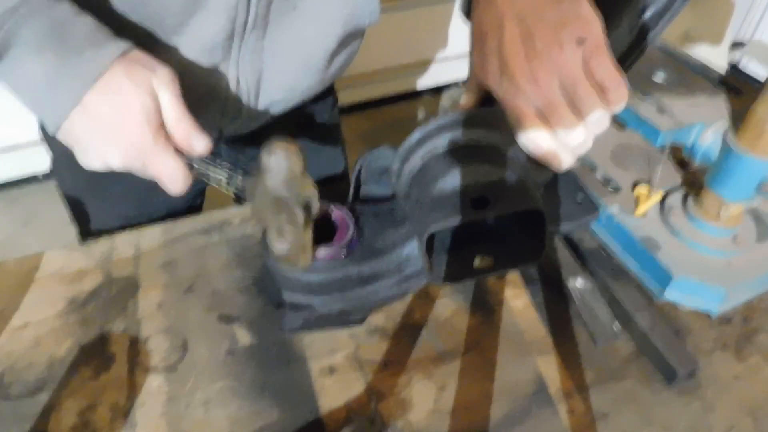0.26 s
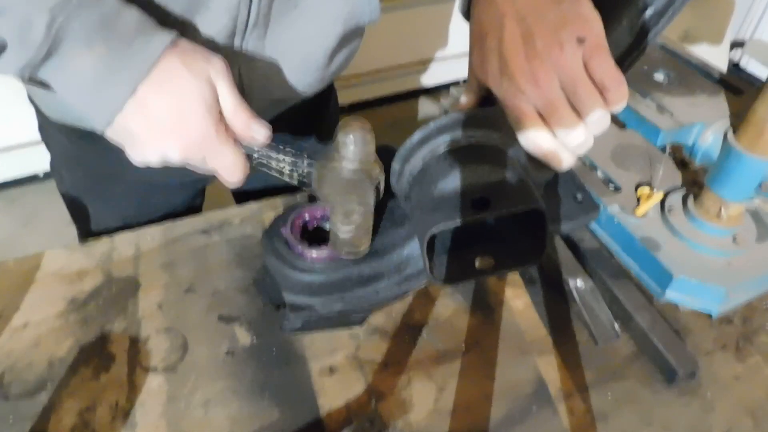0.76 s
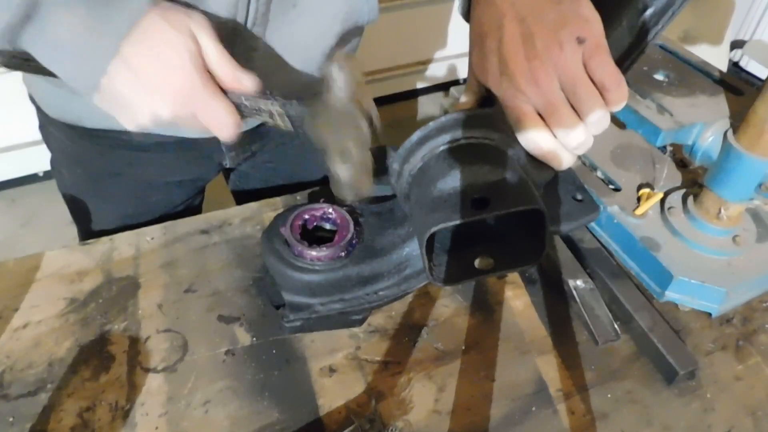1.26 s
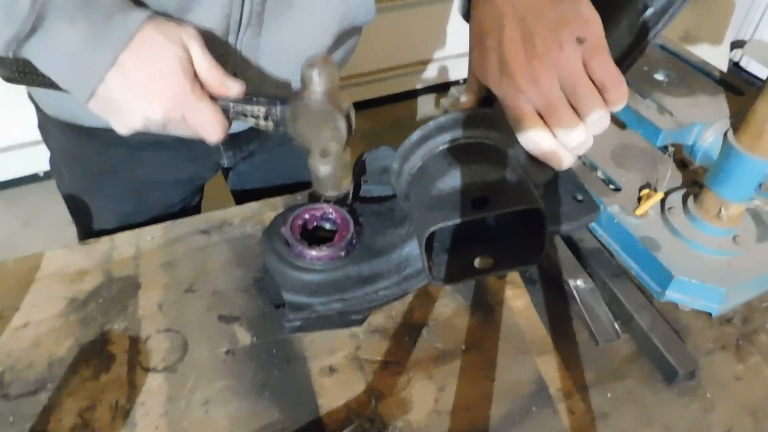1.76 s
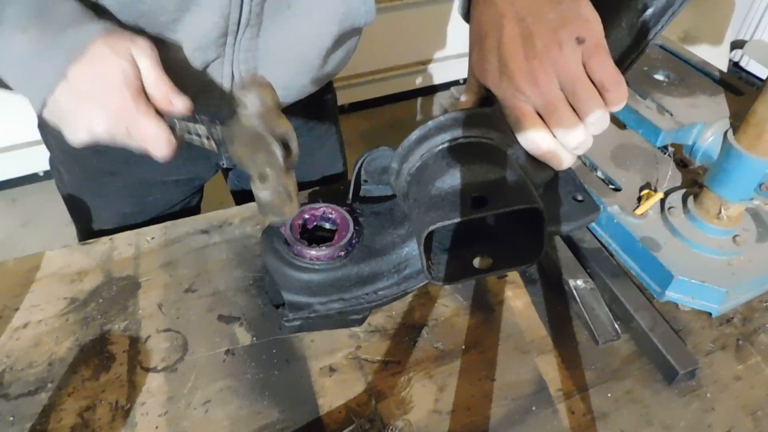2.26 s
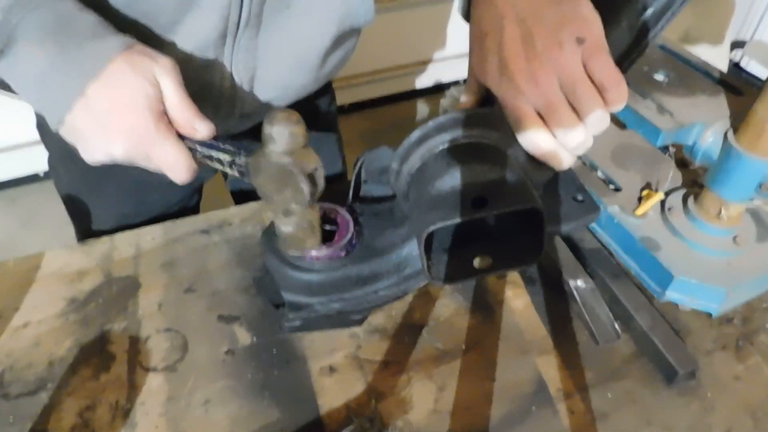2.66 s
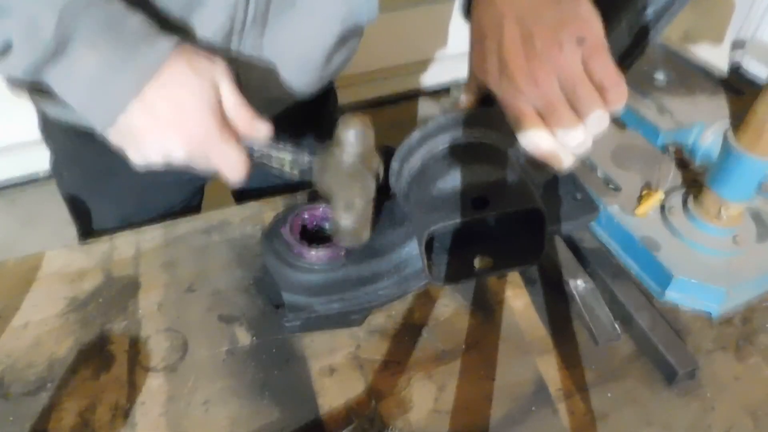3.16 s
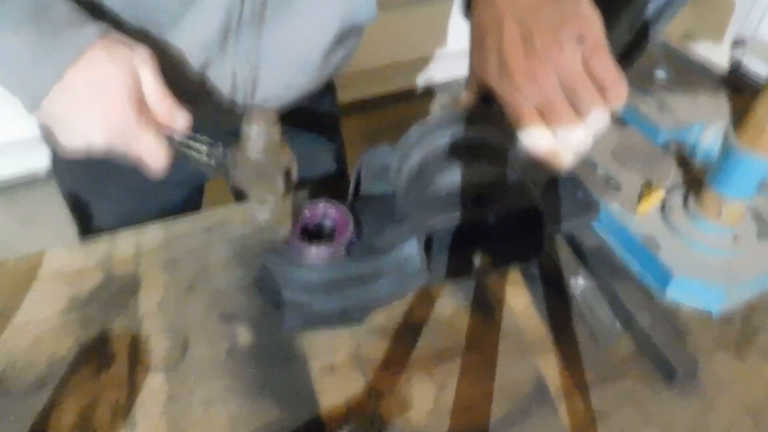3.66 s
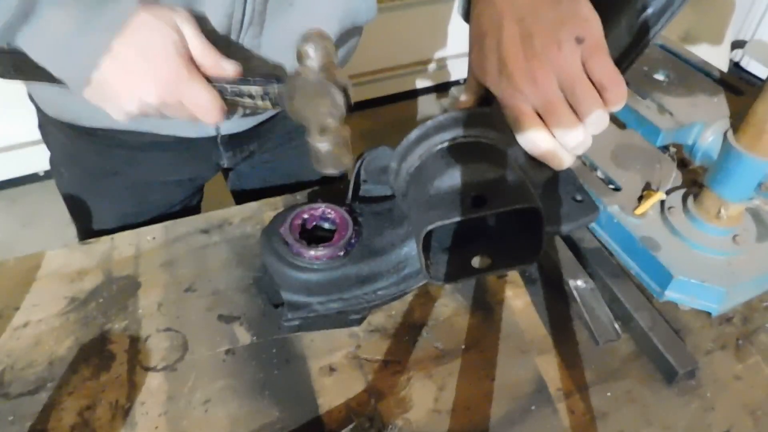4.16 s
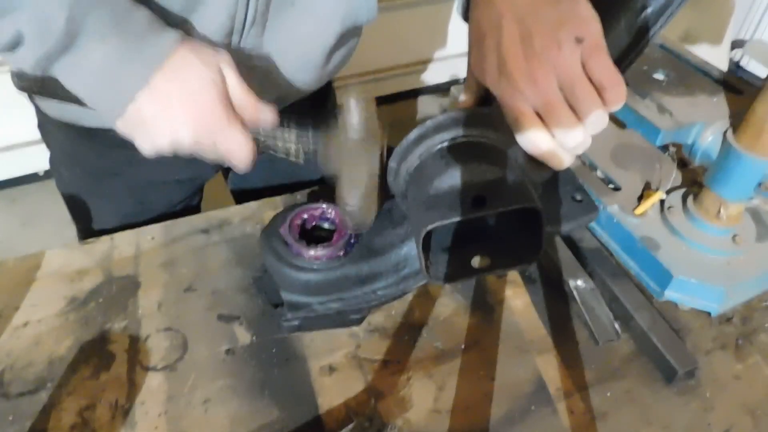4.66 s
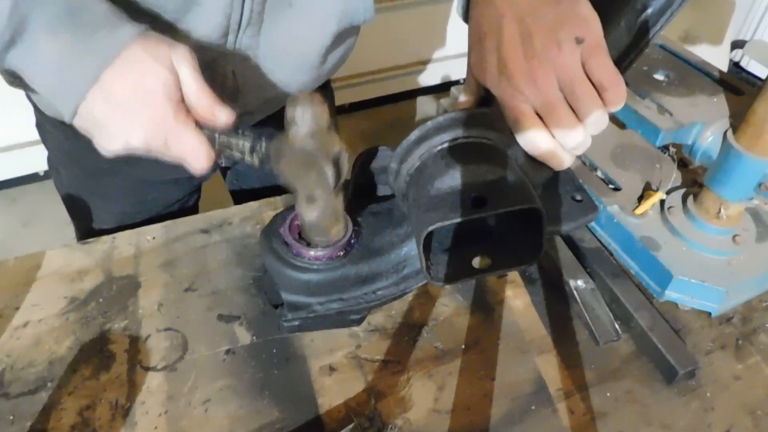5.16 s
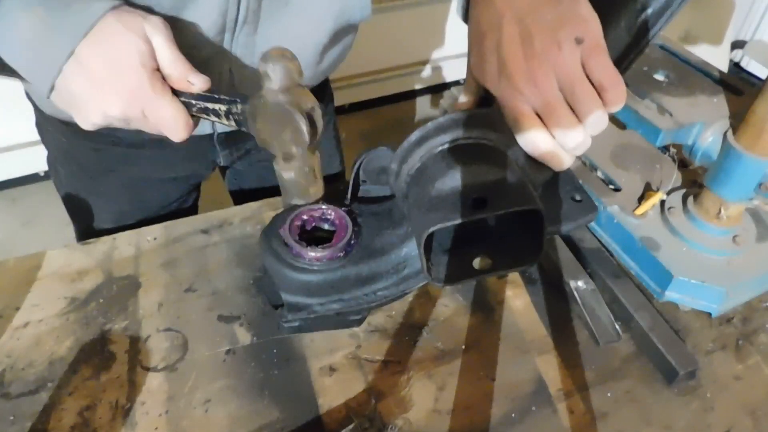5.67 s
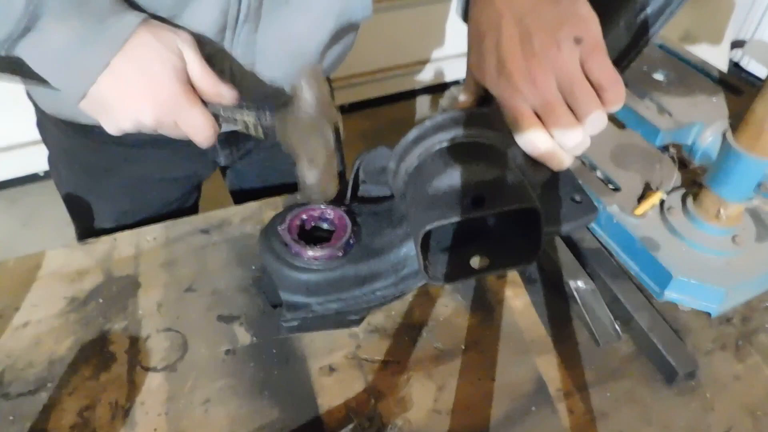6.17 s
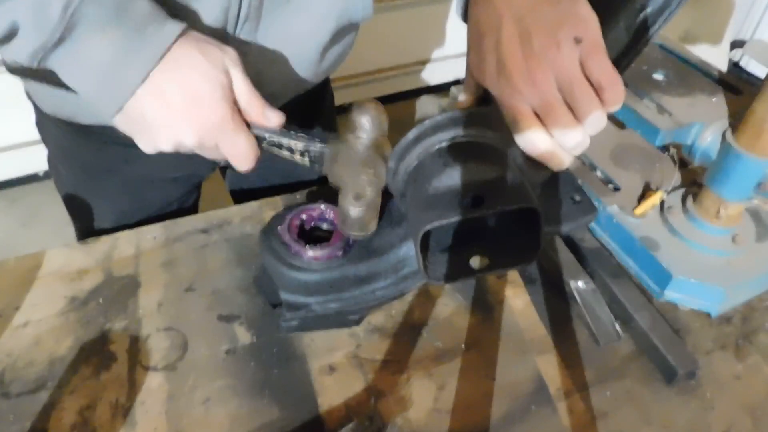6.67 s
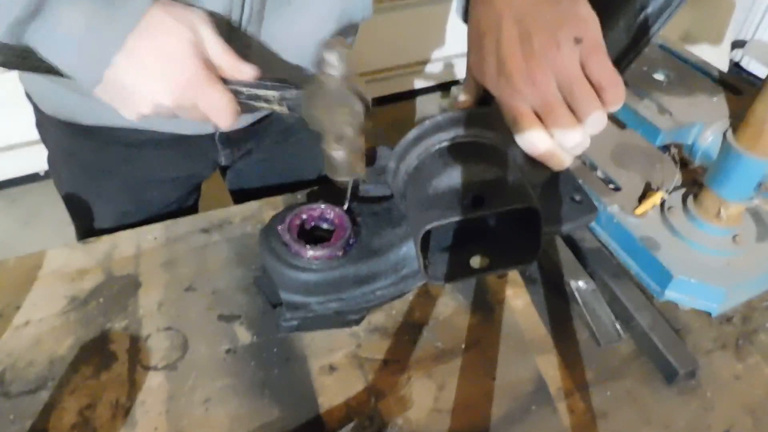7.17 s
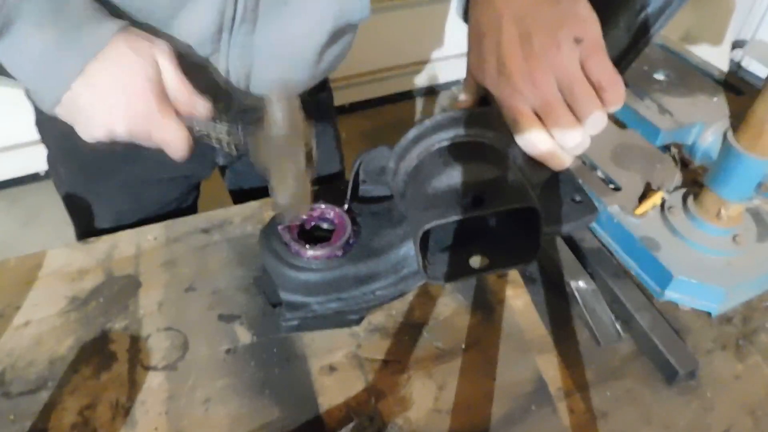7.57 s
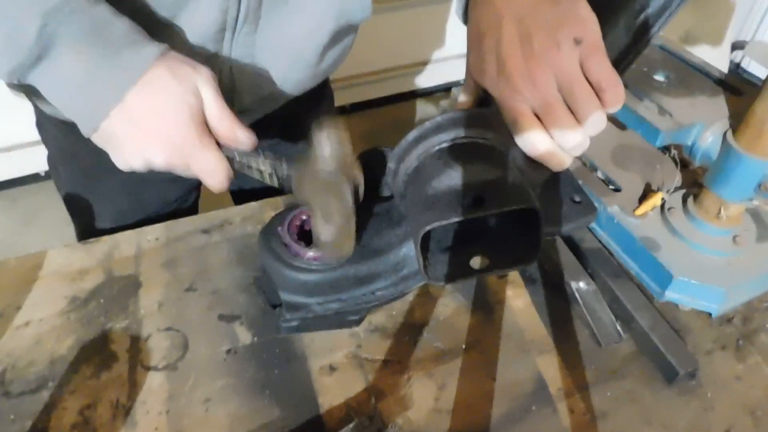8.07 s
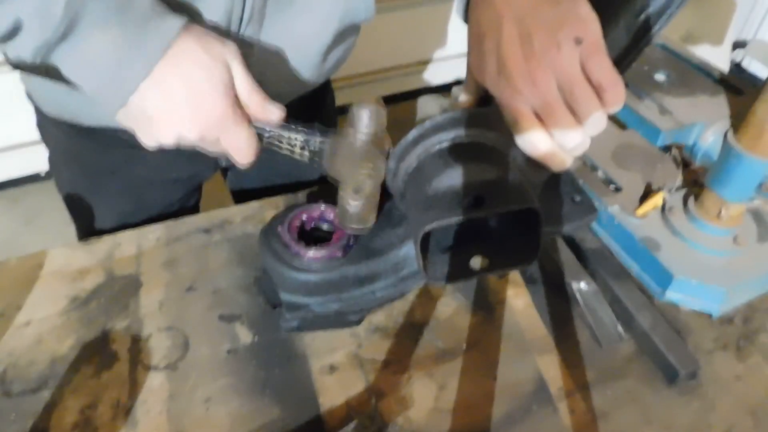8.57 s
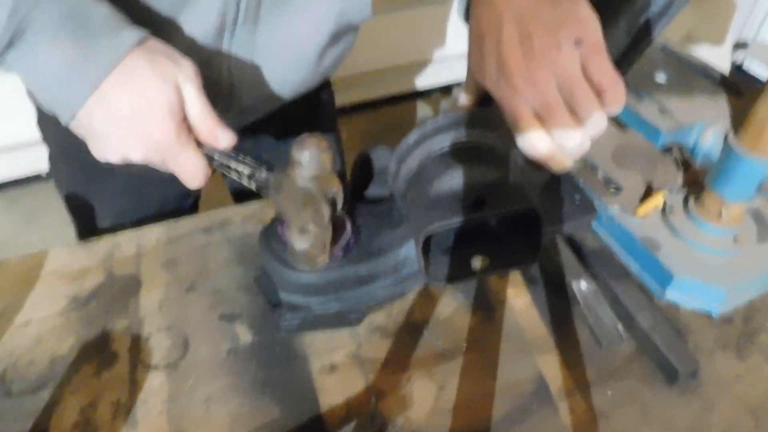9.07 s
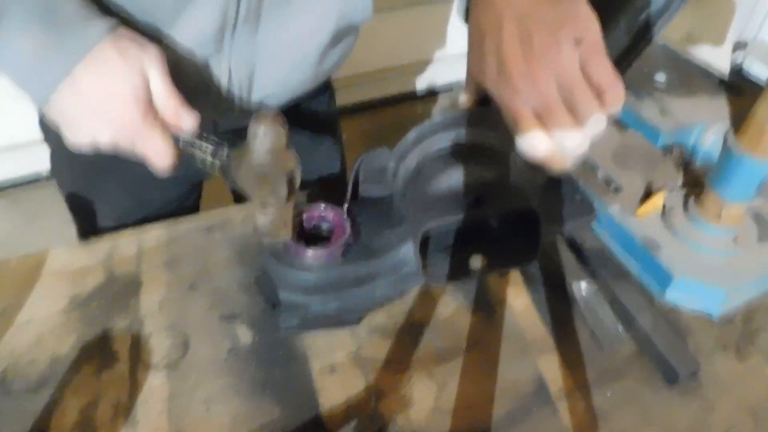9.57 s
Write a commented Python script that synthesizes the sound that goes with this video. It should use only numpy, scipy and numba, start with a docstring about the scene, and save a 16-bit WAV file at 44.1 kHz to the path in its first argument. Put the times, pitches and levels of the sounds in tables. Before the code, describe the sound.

A hammer taps a bearing into a steel housing in quick runs, about five blows a second, broken by brief pauses. Each blow has a sharp crack, a short metallic ring and a thump from the workbench. The tone shifts between dull clanks and brighter pings, and the taps grow slightly harder. Heard from an arm's length away in a small, hard-walled workshop with faint rumble and hiss.

```python
"""Sharp, ringing hammer taps come in quick runs, driving a bearing into a steel housing on a workbench.
Each blow cracks, thumps the bench and rings the housing; the spot struck on the rim decides which modes
speak. A small hard workshop answers over a faint rumble and hiss. The phone, an arm's length away,
overloads on each blow and turns its gain down and up again."""
import sys
import numpy as np
from scipy import signal
from scipy.fft import rfft, irfft, next_fast_len
from scipy.io import wavfile
from numba import njit

SR = 44100
rng = np.random.default_rng(int(sys.argv[2]) if len(sys.argv) > 2 else 0)


def to_wav(s):
    """Save 16-bit WAV."""
    ch = np.atleast_2d(s).T  # columns
    pcm = np.round(np.clip(ch, -1, 1) * 32767)  # PCM
    wavfile.write(sys.argv[1], SR, pcm.astype(np.int16))


N = 433503

# Hammer cues; a square hit sings, a glancing one is dull:
# (time [s], force [dB], place on the rim [degrees clockwise from the far side], squareness [dB])
HAMMER_TAPS = [(-0.17, -5.5, 200, -6), (0.2815, -8, 220, -0.5), (0.509, -6, 166, -6.5),
               (0.7214, -6.5, 148, -9), (0.9304, -7.8, 120, -5.5), (1.1238, -8, 86, -4),
               (1.649, -7, 18, -2.5), (1.8661, -6.5, 350, -1), (2.361, -8, 315, -1.5),
               (2.5715, -5.5, 232, 0), (2.773, -5.5, 176, -3.5), (3.003, -2.6, 130, -4),
               (3.2053, -5, 104, 0.5), (3.698, -3, 318, 1.5), (3.943, -5.5, 309, 1.5),
               (4.3032, -4.5, 17, 2.5), (4.5136, -3.5, 26, 2.5), (4.7282, -3.5, 150, 6.5),
               (4.9525, -4.7, 117, 2), (5.2697, -2, 170, -1.5), (5.4867, -1.7, 188, -4.5),
               (5.8073, -0.5, 168, -0.5), (6.026, -4.5, 290, 5), (6.2378, -2.5, 19, 2.5),
               (6.4266, -7, 34, 4), (6.6194, -5, 63, 1.5), (6.8079, -4, 88, 4), (7.0106, -4.5, 58, 4),
               (7.4183, -5, 278, 2.5), (7.629, -2, 280, 2), (7.9331, -0.4, 200, -3), (8.13, -2.5, 260, 1),
               (8.3265, -3, 49, -4), (8.5212, -2.5, 45, 0), (8.8432, -1, 149, 0.5), (9.043, -2, 166, 3),
               (9.3752, 0, 295, -4.5), (9.5703, -2, 292, 2), (9.778, 0.5, 292, 1.5)]


def hammering(shift_hz=1500, lag_s=3.8e-5, lag_scatter_s=1.7e-5, path_count=3):
    """Runs of taps, each heard directly and through the room; the work is already under way."""
    t, size = np.arange(3 * SR // 4) / SR, 2 * SR
    out = np.zeros((2, N + size))
    phase = rng.random(len(HOUSING_MODES))
    steady, *paths = [rfft(workshop(), size) for _ in range(path_count + 1)]
    # the arm moves between blows: long waves keep their paths through the room, short ones find new ones
    turn = np.arctan(freqs(size) / shift_hz)
    pauses = np.diff([tap[0] for tap in HAMMER_TAPS], prepend=HAMMER_TAPS[0][0])
    for (time_s, force_db, place_deg, square_db), pause_s in zip(HAMMER_TAPS, pauses):
        spot_db = strike_spot(place_deg, square_db, pause_s)
        near, far = rfft(blow(t, spot_db, phase), size)
        direct = direct_path(size, lag_s + lag_scatter_s * rng.standard_normal())  # the spot wanders
        shifted = np.tensordot(unit(rng.standard_normal(path_count)), paths, 1)
        room = np.cos(turn) * steady + np.sin(turn) * shifted
        start = int((time_s + 1) * SR)  # one second of pre-roll
        out[:, start:start + SR] += undb(force_db) * irfft(near * direct + far * room, size)[:, :SR]
    return out[:, SR:SR + N]


def blow(t, spot_db, phase):
    """One tap in layers, (direct feed, room send): the bench knocks, steel rings, the contact cracks."""
    body = bench_knock(t) + ring_wash(t, spot_db["ring"]) + chime(t, spot_db["chime"])
    return body + housing(t, spot_db, phase) + undb(spot_db["crack"]) * crack(t)


# Tone around the rim: per mode family, (level [dB]) at eight even steps clockwise from the far side
RIM_RESPONSE = {"clank": (1, -0.5, -1, -3.5, 4, 4, 4, 5), "bell": (9.5, 3, -2.5, 3.5, -10.5, -0.5, 5.5, 10),
                "ring": (0, 5, 4.5, -7.5, 2.5, 0, 6.5, -3), "clink": (-6.5, 6.5, 4, 1.5, 1, -4.5, -0.5, -8),
                "ping": (8.5, -1, 9, 12, -1, -13, -9, -7), "crack": (-5, -2, -4, -3, -5.5, -2, -7.5, -2),
                "chime": (-5.5, 16, 12.5, 0.5, -3.5, -1.5, 5.5, 2)}
# How much a square hit lifts each mode family: (share of the squareness [0-1])
SQUARENESS_SHARE = {"clank": .39, "bell": 1, "ring": 0.44, "clink": 0.35, "ping": 0.5, "crack": 0.69,
                    "chime": 0.39}


def strike_spot(place_deg, square_db, pause_s, long_pause_s=0.27, wind_up_db=2.5):
    """Place and squareness of a blow set how hard each family of modes is driven, in dB."""
    steps_deg = np.arange(0, 360, 45)
    spot_db = {family: np.interp(place_deg, steps_deg, db, period=360)
               + SQUARENESS_SHARE[family] * square_db for family, db in RIM_RESPONSE.items()}
    # after a pause the hammer falls from higher up and cracks harder
    spot_db["crack"] += wind_up_db * (pause_s > long_pause_s)
    return spot_db


# The voice of the housing with its bearing:
# (family, frequency [Hz], energy [dB], t60 [s], radiation towards the phone [dB])
HOUSING_MODES = [("clank", 306, -15.5, 0.29, -2.5), ("clank", 415, -17, 0.38, -2),
                 ("clank", 495, -15.5, 0.24, 0), ("clank", 647, -16.5, 0.053, 0),
                 ("clank", 783, -10, 0.054, 0), ("clank", 1052, -10.5, 0.055, 0),
                 ("clank", 1092, -0.4, 0.043, 1), ("bell", 1405, -6.5, 0.48, -8),
                 ("bell", 1410, -10, 0.051, 0), ("ring", 1783, -17, 0.14, 0),
                 ("ring", 1824, -15.5, 0.11, 0), ("ring", 1978, -7, 0.13, 0), ("ring", 2142, -7.5, 0.12, 0),
                 ("ring", 1800, -19, 0.075, 0), ("ring", 2321, -7.5, 0.15, 0),
                 ("ring", 2380, -15.5, 0.17, 0), ("ring", 2462, -11.5, 0.13, -6.5),
                 ("clink", 2775, -6.5, 0.057, 5.8), ("clink", 3400, -26.5, 0.057, -1),
                 ("ping", 2960, -11, 0.071, 0.96), ("ping", 3075, -10.5, 0.051, -5),
                 ("ping", 3200, -7.5, 0.057, -4), ("crack", 3630, -19, 0.083, 0),
                 ("crack", 4090, -15, .04, 0), ("chime", 3900, -26, 0.073, 0),
                 ("chime", 4100, -31, 0.09, 0), ("crack", 8650, -26, 0.35, 0)]


def housing(t, spot_db, phase, scatter_db=2.0, detune=0.0017, rise_s=0.00064):
    """The steel rings, (direct feed, room send); grip and spot shift each mode from blow to blow."""
    hz, db, t60, facing_db = np.transpose([mode[1:] for mode in HOUSING_MODES])
    level_jitter, pitch_jitter = rng.standard_normal((2, len(hz)))
    db = db + np.array([spot_db[mode[0]] for mode in HOUSING_MODES]) + scatter_db * level_jitter
    hz = hz * (1 + detune * pitch_jitter)
    modes = np.sin(2 * np.pi * (hz[:, None] * t + phase[:, None])) * fade(t, t60[:, None])
    modes /= np.linalg.norm(modes, axis=1, keepdims=True)
    return undb([db + facing_db, db]) @ modes * (1 - np.exp(-t / rise_s))


# Bright edge of steel on steel: (frequency [Hz], level [dB])
CRACK_EQ = [(500, -21), (2000, -15.5), (4200, -2.5), (6000, 0.5), (8500, 2), (11500, 2.5), (14000, -2.5),
            (16000, -7.5)]


def crack(t, snap_t60=0.01, sizzle_t60=0.16, sizzle_db=-18, rise_s=0.00034, db=-1.5):
    """The contact snaps, and the bearing's crowded high modes sizzle out just after it."""
    envelope = (fade(t, snap_t60) + undb(sizzle_db) * fade(t, sizzle_t60)) * (1 - np.exp(-t / rise_s))
    return undb(db) * unit(colour(rng.standard_normal(len(t)) * envelope, CRACK_EQ))


# Weight under each tap, from the bench: (frequency [Hz], level [dB])
BENCH_EQ = [(30, -10.5), (60, -8.5), (105, 2), (200, -2.5), (300, -1), (420, -2.5), (600, 0), (1000, -0.5),
            (1600, -2), (2400, -11.5), (3200, -13.5), (3700, -19.5), (9000, -43.5)]


def bench_knock(t, t60=0.09, db=3.0):
    """The bench and the clamped parts give a dense, quickly damped thump."""
    return undb(db) * cluster(t, t60, BENCH_EQ)


# Metallic midrange fill: (frequency [Hz], level [dB])
WASH_EQ = [(900, -18.5), (1700, -3), (2050, -2), (2450, -2.5), (2600, -7), (3100, -3), (3600, -18),
           (7000, -29)]


def ring_wash(t, drive_db, t60=0.11, db=-4.5):
    """Crowded weak modes fill the gaps between the strong ones of the ring family."""
    return undb(db + drive_db) * cluster(t, t60, WASH_EQ)


# Shimmer on top of the ring: (frequency [Hz], level [dB])
CHIME_EQ = [(2500, -32), (3900, -12.5), (4400, 3.5), (4850, 0.5), (5200, -11.5), (5600, -4), (6100, -18.5),
            (9000, -28)]


def chime(t, drive_db, t60=0.067, db=-18.5):
    """Crowded high modes of the chime family glint briefly."""
    return undb(db + drive_db) * cluster(t, t60, CHIME_EQ)


# Stereo tilt of the direct sound: (frequency [Hz], left over right [dB])
DIRECT_BALANCE = [(100, 3), (1000, 7), (2500, -1.5), (10000, -2.5)]


def direct_path(size, lag_s):
    """Response of the straight path: it reaches the right microphone a moment before the left."""
    hz = freqs(size)
    gain = undb(at(hz, DIRECT_BALANCE) / 2)
    return np.array([gain * np.exp(-2j * np.pi * hz * lag_s), 1 / gain])


# Reverb of the small hard room: (frequency [Hz], t60 [s], echo level [dB])
ROOM_REVERB = [(60, 0.67, 0), (213, 0.4, 0), (421, 0.55, 5), (1220, 0.62, -1.5), (2930, 0.52, -3.5),
               (5860, 0.51, -6.5), (13200, 0.37, -11.5)]


def workshop(build_s=0.012, echo_db=-1.0, close_t60=0.038, close_db=-3.0, left_db=1.35, band_count=12):
    """Room impulse: bench and body reflect at once; the walls' echo builds later, its top dying first."""
    t = np.arange(SR) / SR
    noise = rfft(diffuse(SR))
    centres = np.geomspace(ROOM_REVERB[0][0], ROOM_REVERB[-1][0], band_count)
    echo = undb(close_db) * diffuse(SR) * unit(fade(t, close_t60))
    for hz, share in zip(centres, np.eye(band_count)):
        band = irfft(noise * at(freqs(SR), np.c_[centres, share]))
        envelope = unit(fade(t, at(hz, ROOM_REVERB)) * (1 - np.exp(-t / build_s)))
        echo += band * envelope * undb(echo_db + at(hz, ROOM_REVERB, column=2))
    return echo * undb(np.array([[left_db], [-left_db]]) / 2)


# Still air of the workshop: (frequency [Hz], level [dB])
ROOM_TONE_EQ = [(25, 1.5), (60, -8), (150, -17.5), (400, -20), (1000, -17), (1550, -6.5), (2100, -21),
                (4000, -28), (8500, -35.5), (15000, -50)]


def room_tone(db=-46.5):
    """A faint, steady bed of rumble and hiss from all sides."""
    noise = colour(diffuse(next_fast_len(N)), ROOM_TONE_EQ)[:, :N]
    return undb(db) * noise / noise.std()


def cluster(t, t60, eq):
    """Many close modes of random phase, dying together."""
    half_decay = fade(t, 2 * t60)  # applied twice, it gives t60
    bins = rfft(rng.standard_normal(len(t)) * half_decay)
    even_modes = irfft(bins / np.abs(bins), len(t))
    return unit(colour(even_modes * half_decay, eq))


def diffuse(size, null_hz=2800):
    """Noise from all sides at two close microphones: alike in the bass, unrelated in the treble."""
    mid, side = rfft(rng.standard_normal((2, size)))
    alike = 0.98 * np.sinc(freqs(size) / null_hz)
    mid, side = mid * np.sqrt((1 + alike) / 2), side * np.sqrt((1 - alike) / 2)
    return irfft([mid + side, mid - side], size)


def colour(x, eq):
    """Minimum-phase EQ through (frequency [Hz], level [dB]) points: nothing rings ahead of a hit."""
    size = 2 * x.shape[-1]
    cepstrum = irfft(np.log(undb(at(freqs(size), eq))))
    cepstrum[1:size // 2] *= 2
    cepstrum[size // 2 + 1:] = 0
    return irfft(rfft(x, size) * np.exp(rfft(cepstrum)))[..., :size // 2]


def undb(db):
    """Decibels to gain."""
    return 10 ** (np.asarray(db) / 20)


def unit(x):
    """Scale to an energy of one per channel."""
    return x / np.sqrt(np.mean(np.sum(x ** 2, axis=-1)))


def fade(t, t60):
    """Exponential decay, 60 dB down after t60 seconds."""
    return np.exp(-np.log(1000) * t / t60)


def at(hz, table, column=1):
    """Read a table on a log-frequency axis."""
    table = np.asarray(table, float)
    return np.interp(np.log(hz + 1), np.log(table[:, 0]), table[:, column])


def freqs(size):
    """Bin frequencies for a sound of this length."""
    return np.arange(size // 2 + 1) * SR / size


@njit
def follow(x, attack, release):
    """Envelope that rises fast and sinks slowly."""
    out, level = np.empty(len(x)), 0.
    for i in range(len(x)):
        level += (x[i] - level) * (attack if x[i] > level else release)
        out[i] = level
    return out


def scene(hammer_db=21.5):
    """Hammering up front, quiet room tone behind."""
    return undb(hammer_db) * hammering() + room_tone()


def record(dry, threshold_db=-11.5, attack_s=0.0056, release_s=0.083, slope=0.63, knee=4.0, top_hz=15900):
    """The phone's gain ducks after each blow and lets the room swell back; the first peaks clip."""
    envelope = follow(np.abs(dry).max(axis=0), 1 / (attack_s * SR), 1 / (release_s * SR))
    ducked = dry * np.maximum(envelope / undb(threshold_db), 1) ** -slope
    clipped = ducked / (1 + np.abs(ducked) ** knee) ** (1 / knee)
    low_pass = signal.ellip(10, 0.1, 80, top_hz, fs=SR, output="sos")
    return signal.sosfilt(low_pass, clipped)


dry = scene()
out = record(dry)
to_wav(out)
```